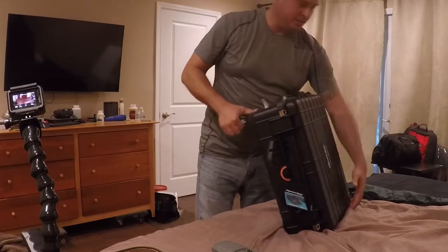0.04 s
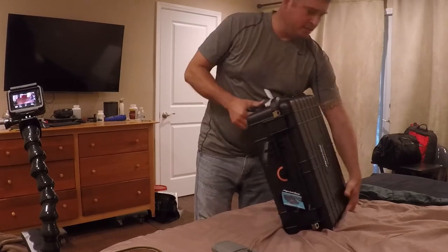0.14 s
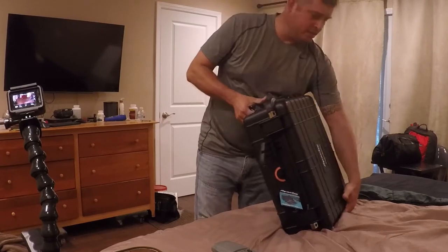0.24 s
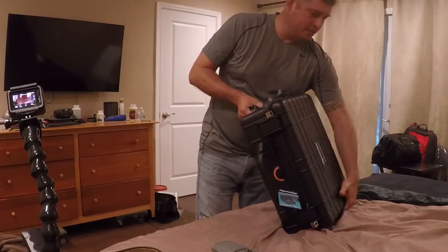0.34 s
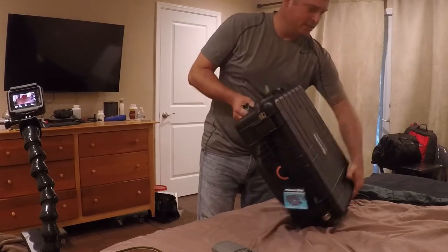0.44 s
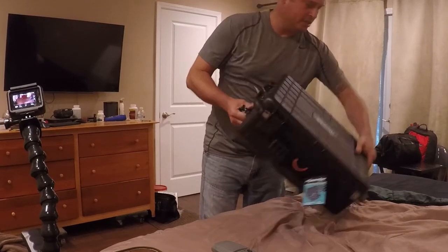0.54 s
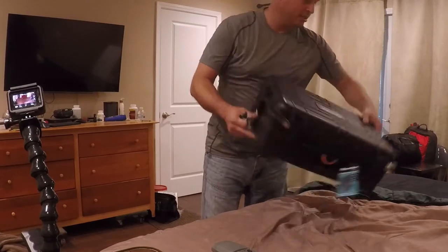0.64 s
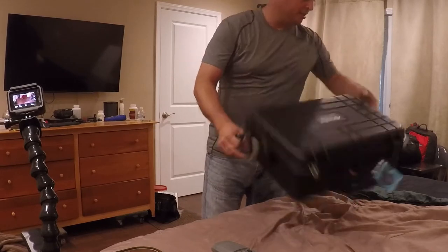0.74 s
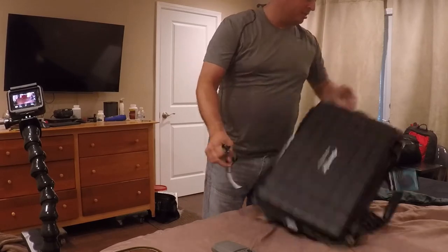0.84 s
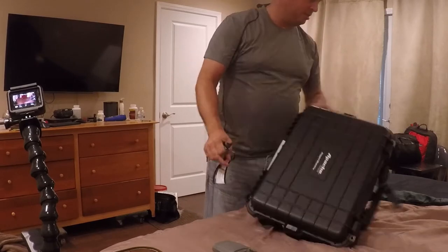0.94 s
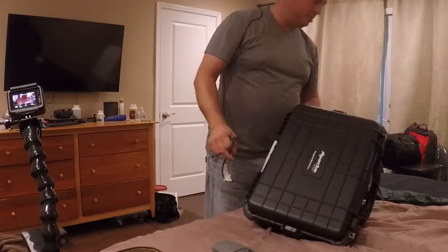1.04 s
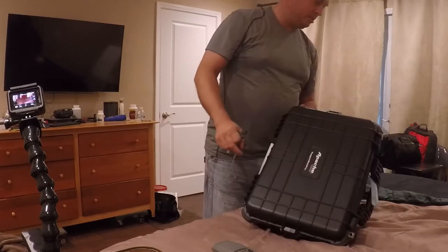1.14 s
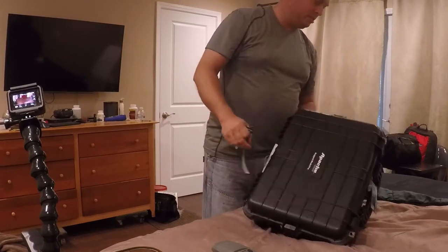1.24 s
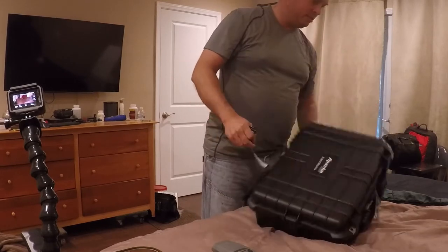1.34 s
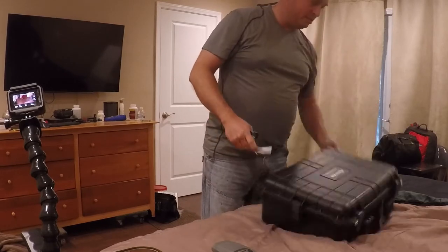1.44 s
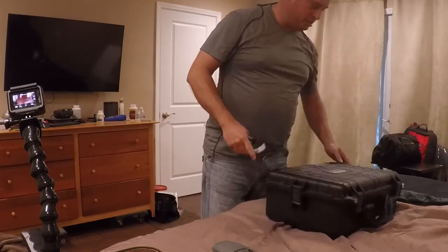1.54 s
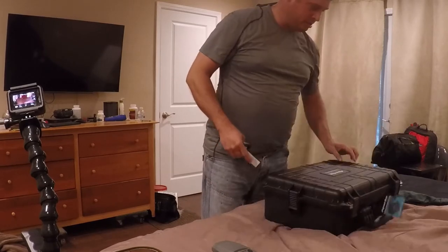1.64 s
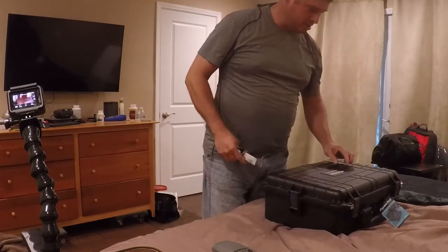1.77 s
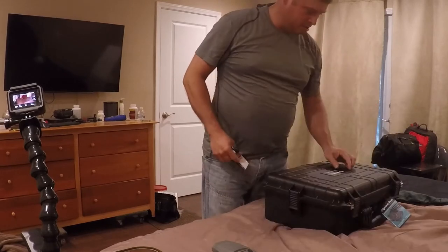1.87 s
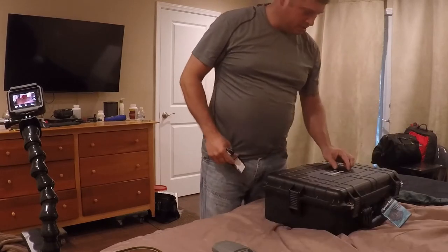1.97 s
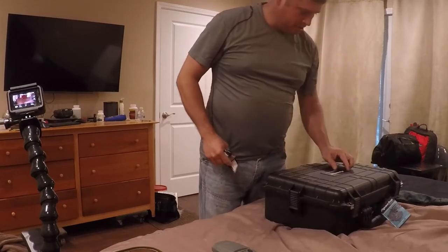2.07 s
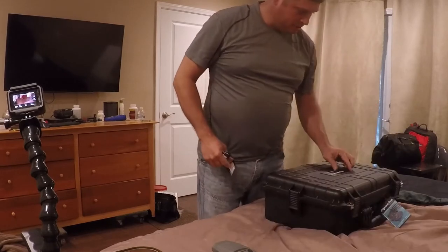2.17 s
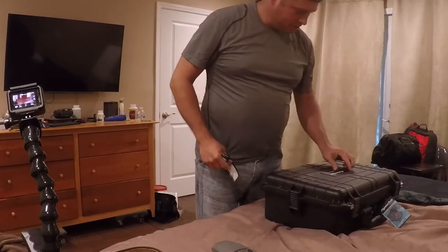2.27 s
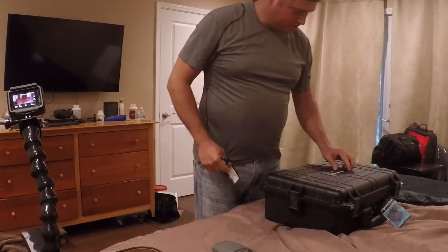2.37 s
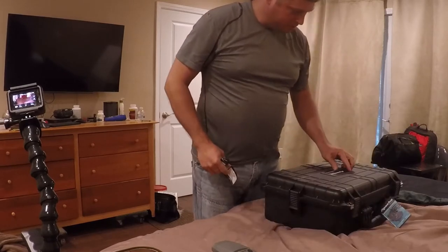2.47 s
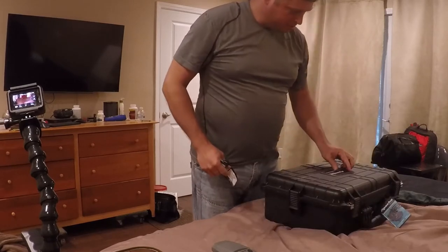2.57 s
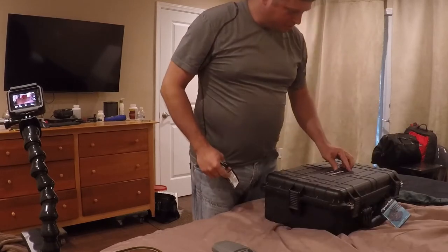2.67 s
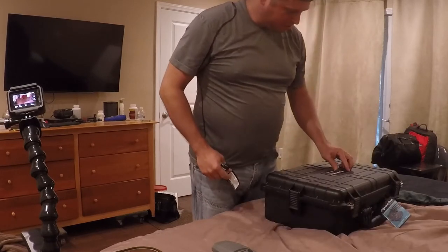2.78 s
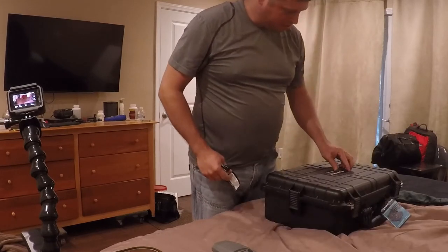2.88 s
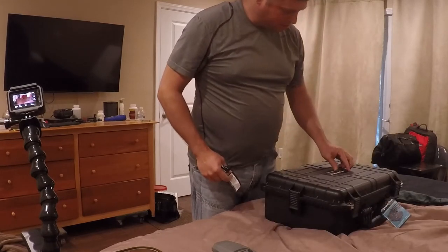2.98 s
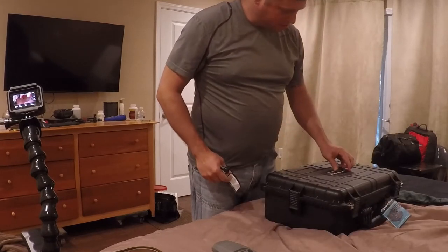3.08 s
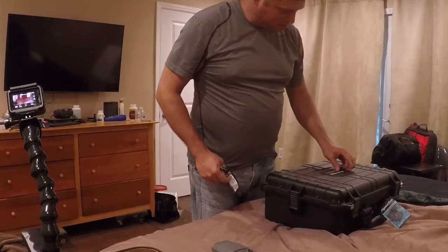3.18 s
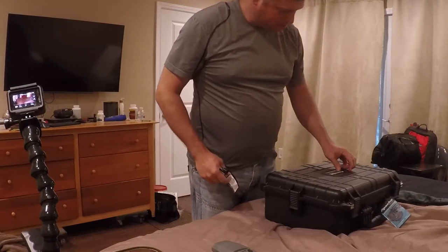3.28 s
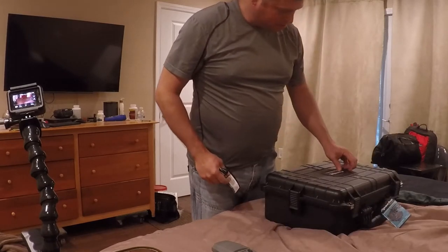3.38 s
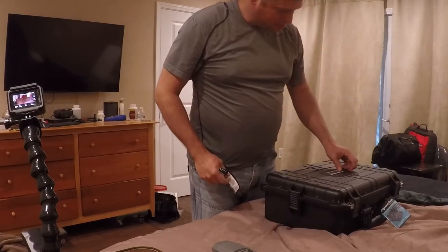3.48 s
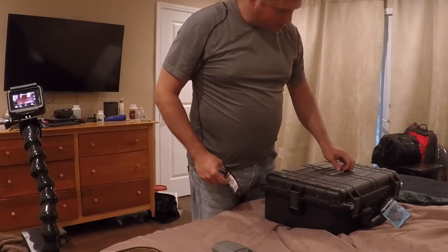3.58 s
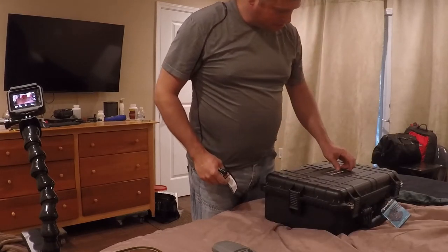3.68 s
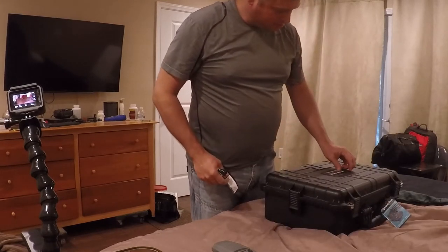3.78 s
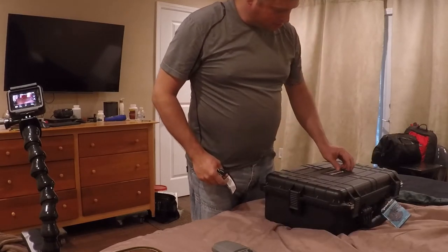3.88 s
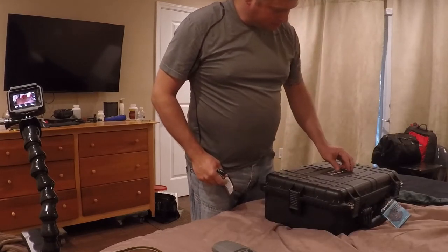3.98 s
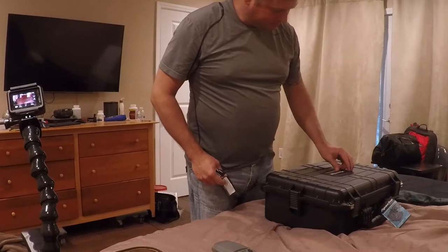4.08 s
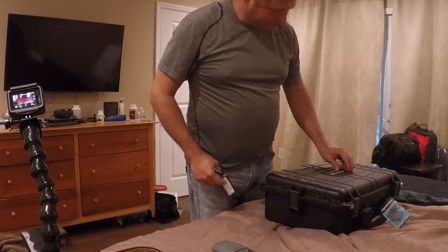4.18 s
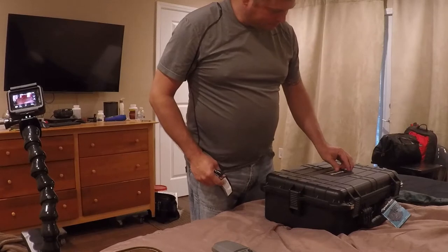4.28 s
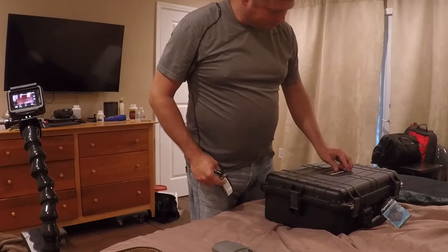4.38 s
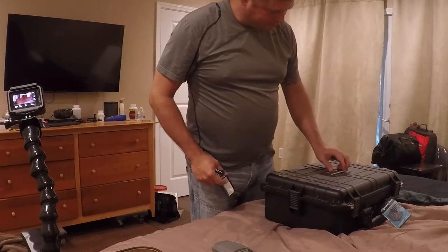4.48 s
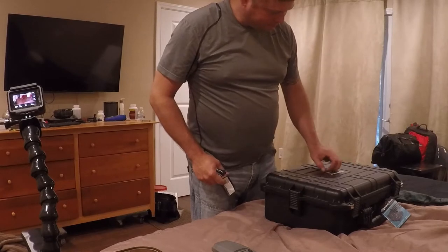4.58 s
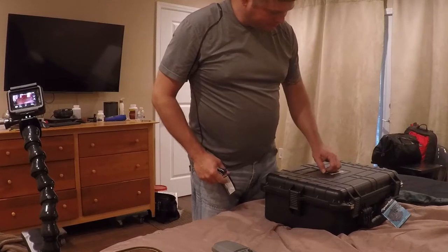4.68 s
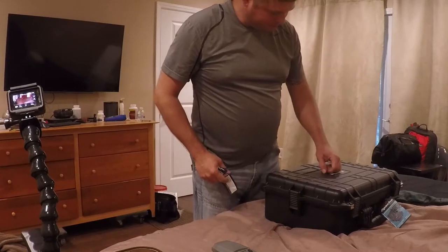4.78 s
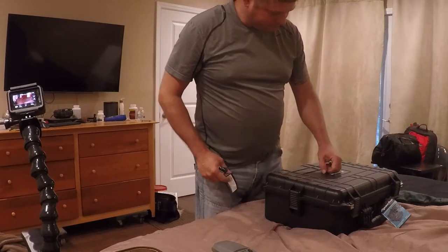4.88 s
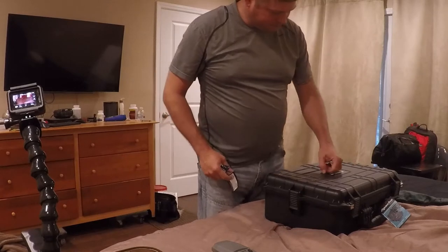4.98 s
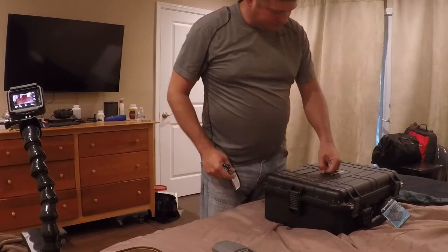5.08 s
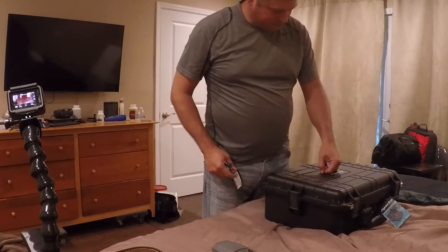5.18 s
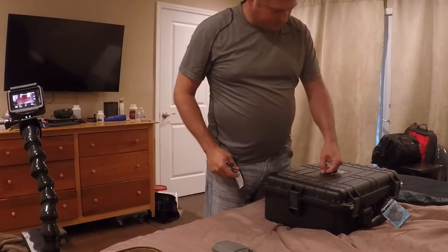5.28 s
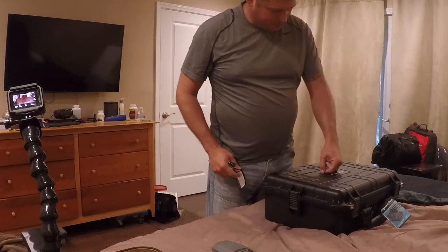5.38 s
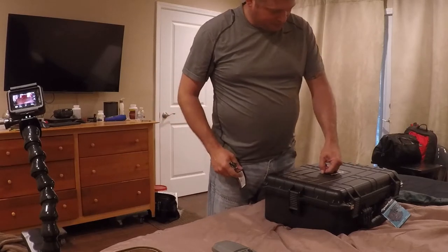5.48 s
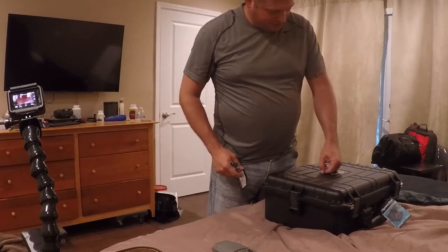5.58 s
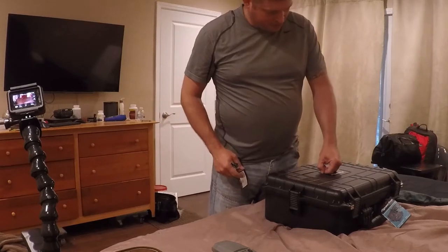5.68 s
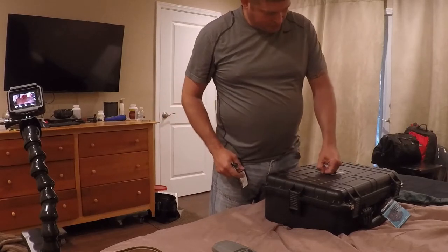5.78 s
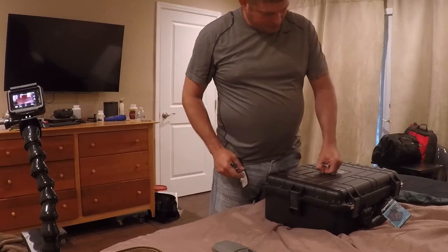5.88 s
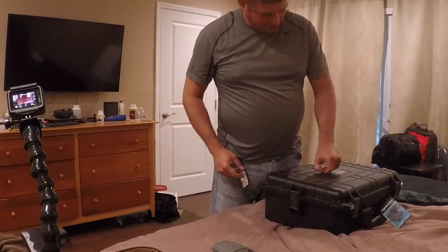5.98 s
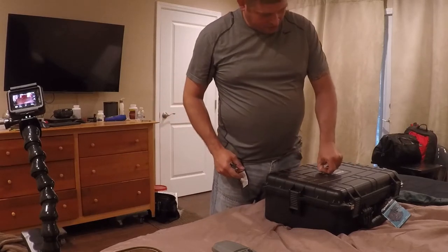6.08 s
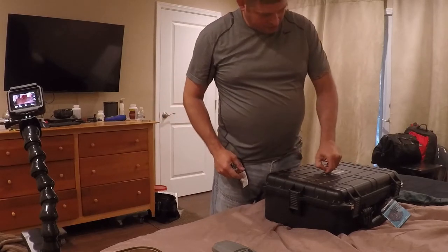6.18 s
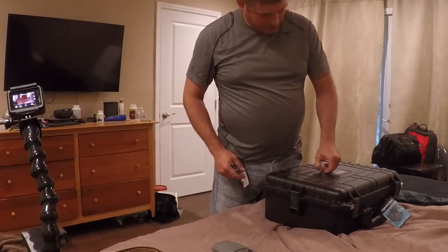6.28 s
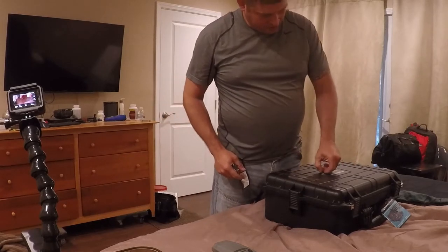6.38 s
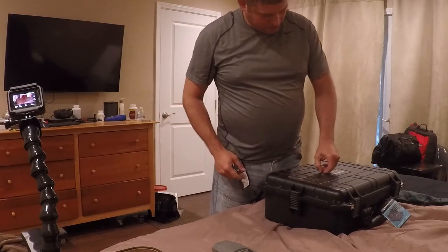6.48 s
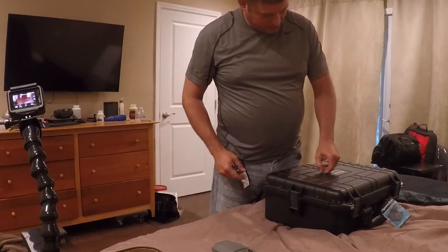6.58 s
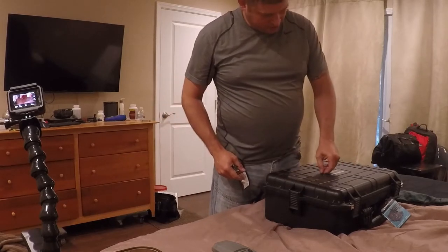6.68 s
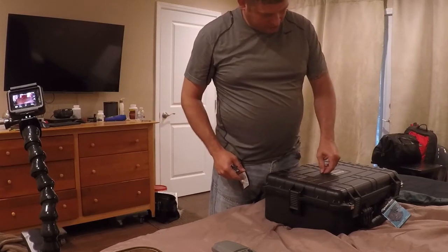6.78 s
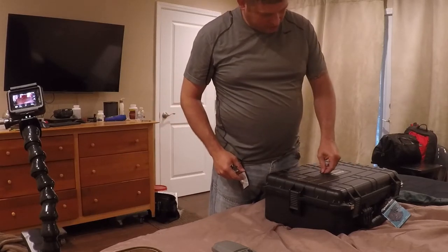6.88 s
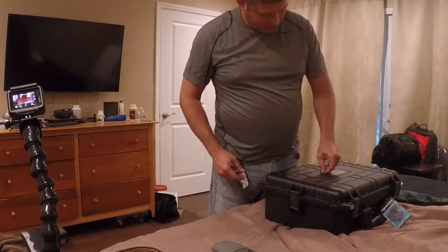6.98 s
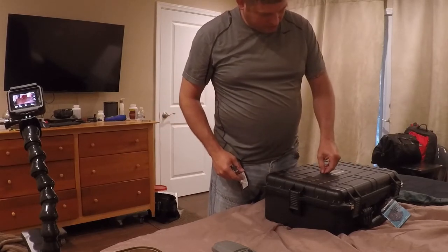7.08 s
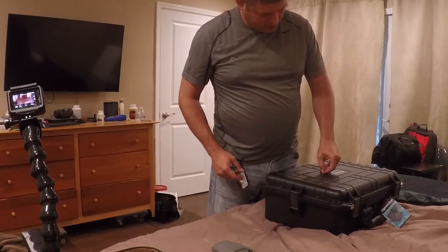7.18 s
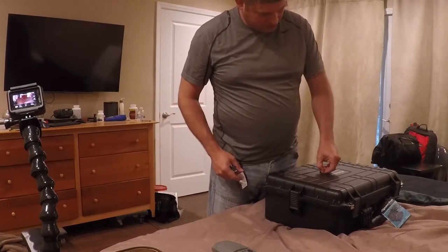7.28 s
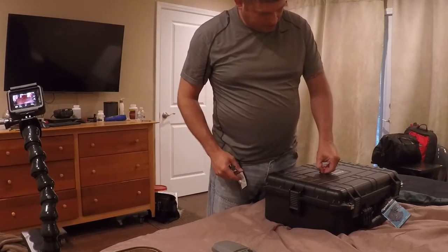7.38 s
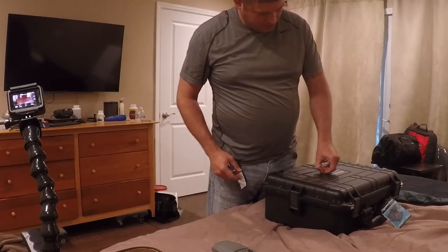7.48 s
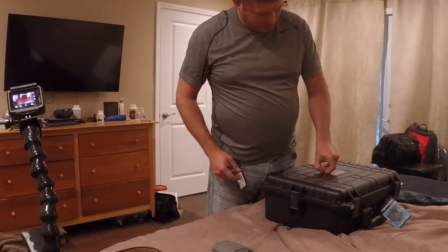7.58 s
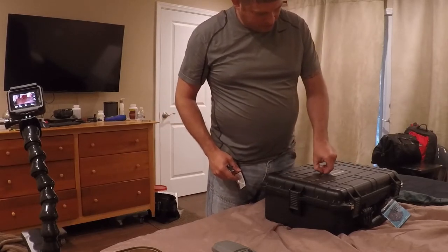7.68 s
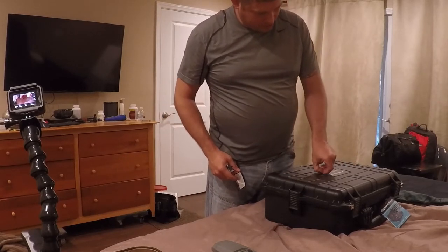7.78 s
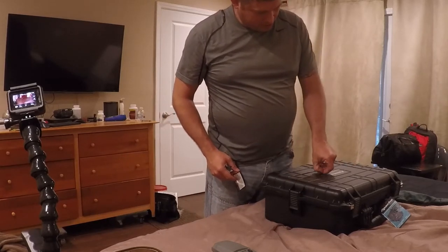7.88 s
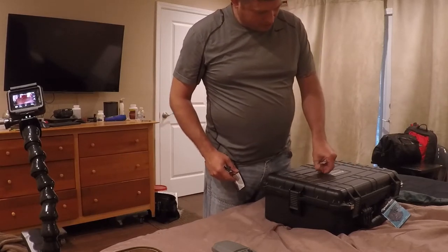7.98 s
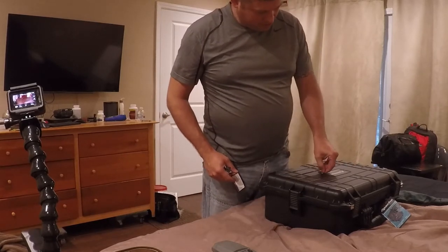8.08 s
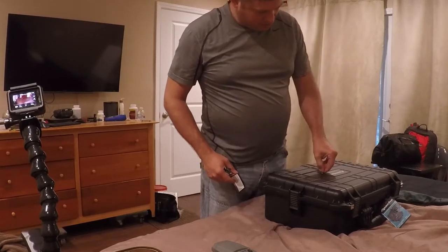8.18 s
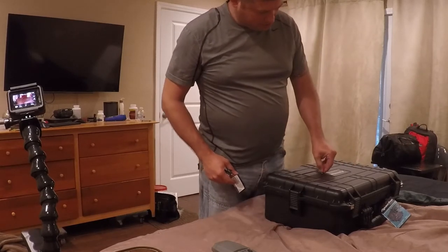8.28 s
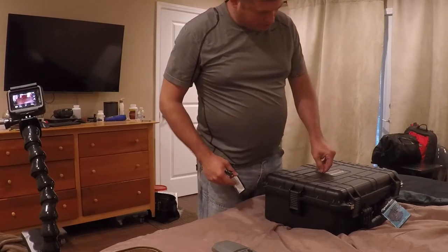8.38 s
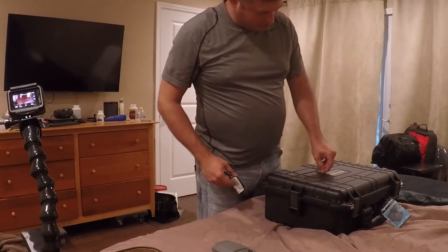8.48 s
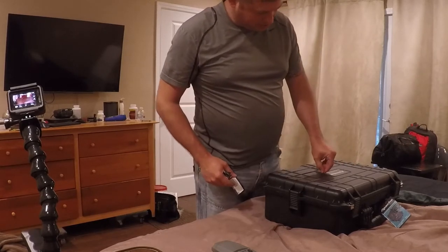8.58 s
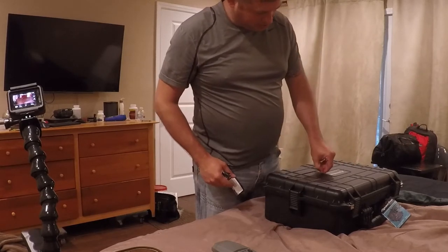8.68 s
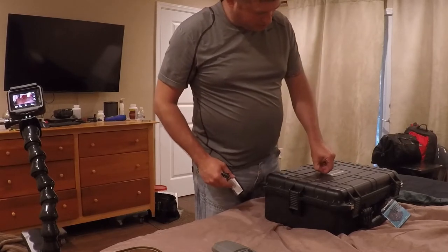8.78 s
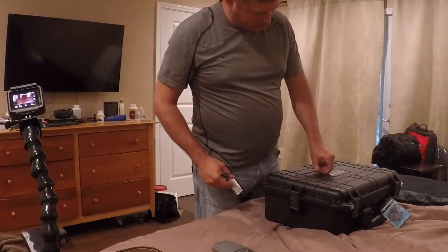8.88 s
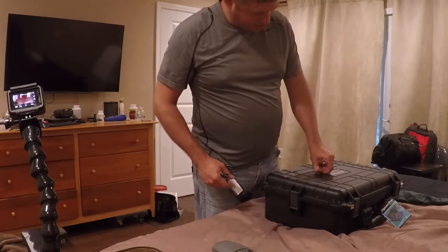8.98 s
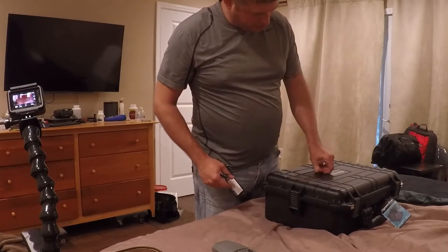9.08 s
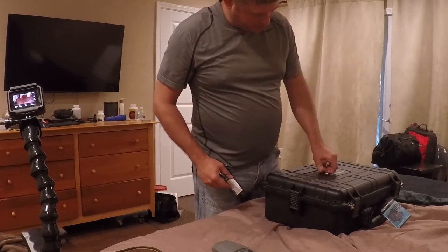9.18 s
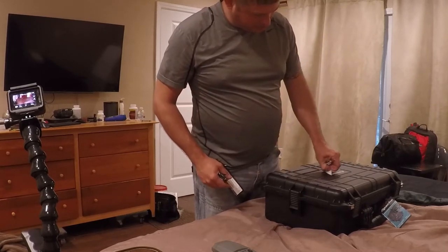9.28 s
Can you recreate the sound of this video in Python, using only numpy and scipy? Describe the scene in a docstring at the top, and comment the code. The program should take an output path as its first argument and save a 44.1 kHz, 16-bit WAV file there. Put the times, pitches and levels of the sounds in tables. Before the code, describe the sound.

In a quiet bedroom, stiff labels rip off a hollow plastic case that thumps onto a bed, then fingernails pick faintly at its lid.

```python
"""Cloth rustles over a quiet room as a hard plastic case is turned over and laid on a bed, and labels are torn off.
Knocks and fingers excite decaying modes of the hollow shell; rubbing stirs it with filtered random impulses.
A nail picks at a label's edge in short resonant noise bursts and scratches the shell's grain.
The glue lets go in bursts of tiny snaps, filtered by the free flap; the camera cuts the deep bass."""
import sys
import numpy as np
from scipy import signal
from scipy.fft import rfft, irfft, next_fast_len
from scipy.io import wavfile
from scipy.ndimage import map_coordinates

SR = 44100
rng = np.random.default_rng(int(sys.argv[2]) if len(sys.argv) > 2 else 0)


def bounce(signal):
    """Save signal as a 16-bit WAV file at the path given by the first command-line argument."""
    frames = np.transpose(np.atleast_2d(signal))
    limited = np.clip(frames, -1, 1)
    pcm = np.round(limited * 32767).astype(np.int16)
    wavfile.write(sys.argv[1], SR, pcm)


N = 411894


def amp(db):
    """Decibels to gain."""
    return 10 ** (np.asarray(db) / 20)


def unit(x):
    """Scale to rms 1."""
    return x / np.sqrt(np.mean(x ** 2) + 1e-20)


def crest(x):
    """Scale to peak 1."""
    return x / (np.abs(x).max() + 1e-12)


def along(points, hz):
    """Read (Hz, value) points on a log-frequency axis."""
    point_hz, value = np.transpose(points)
    return np.interp(np.log(hz + 1), np.log(point_hz + 1), value)


def below(hz, top_hz):
    """Gain of a second-order low-pass."""
    return 1 / np.hypot(1, (hz / top_hz) ** 2)


def wobble(knots_per_s):
    """Smooth random curve through normally distributed knots."""
    knots = rng.standard_normal(int(N * knots_per_s / SR) + 4)
    return map_coordinates(knots, [np.arange(N) * knots_per_s / SR])


def coloured(x, gain):
    """Causal (minimum-phase) filter with the given gain of frequency."""
    n = x.shape[-1]
    m = 2 * next_fast_len(n // 2 + 4096)
    hz = np.fft.rfftfreq(m, 1 / SR)
    cepstrum = irfft(np.log(np.maximum(gain(hz), 1e-6)))
    # folding the cepstrum onto positive time gives minimum phase
    cepstrum[1:m // 2] *= 2
    cepstrum[m // 2 + 1:] = 0
    response = np.exp(rfft(cepstrum))
    return irfft(rfft(x, m) * response, m)[..., :n]


def filtered(x, gain):
    """Zero-phase filter with the given gain of frequency."""
    m = next_fast_len(N + SR // 2)
    return irfft(rfft(x, m) * gain(np.fft.rfftfreq(m, 1 / SR)), m)[..., :N]


def shaped(x, spectrum):
    """Filter x causally by a (Hz, dB) curve."""
    return coloured(x, lambda hz: amp(along(spectrum, hz)))


def spread(pair, width):
    """Two unrelated signals as a diffuse stereo field: mid plus and minus side."""
    side = shaped(pair[1], width)
    return np.array([pair[0] + side, pair[0] - side])


def add(track, start_s, sound):
    """Mix a stereo sound in at start_s."""
    start = max(round(start_s * SR), 0)
    part = sound[:, :max(N - start, 0)]
    track[:, start:start + part.shape[1]] += part


def snaps(n, per_s, scatter_db):
    """Random impulses of uneven size and either sign, rms 1."""
    chance, size = rng.random(n), rng.standard_normal(n)
    height = amp(scatter_db * np.clip(size, -2, 2))
    return unit((chance < per_s / SR) * height * rng.choice([-1, 1], n))


# Room decay. Each row: frequency in Hz, t60 in s.
ROOM_T60 = [(120, 0.5), (320, 0.25), (840, 0.37), (2200, 0.32), (5800, 0.36), (14000, 0.25)]
# Stereo width of the reflected sound. Each row: frequency in Hz, side re mid gain in dB.
ROOM_WIDTH = [(130, 0.5), (280, -30), (500, -6), (900, 1), (1400, -1.5), (2200, -0.5), (4000, -6.5),
              (7500, 3.5), (12000, 2)]


def in_room(x, wet_db, build_s=0.0016):
    """Direct sound plus a random wall tail that builds up, then decays at its own speed per frequency."""
    hz, t, z = signal.stft(rng.standard_normal((2, SR // 2)), SR, nperseg=256)
    decay = amp(-60 * t / along(ROOM_T60, hz)[:, None])
    tail = signal.istft(z * decay, SR, nperseg=256)[1]
    tail_t = np.arange(tail.shape[1]) / SR
    tail = tail * (1 - np.exp(-(tail_t / build_s) ** 2))
    answer = amp(wet_db) * spread(tail / np.linalg.norm(tail[0]), ROOM_WIDTH)
    answer[:, 0] += 1  # direct sound
    return signal.fftconvolve(x[None], answer, axes=1)


# Air noise and microphone hiss. Each row: frequency in Hz, gain in dB.
QUIET_SPECTRUM = [(40, -6), (110, -2.5), (190, 1.5), (300, -3.5), (500, -10), (1000, -15), (2000, -18.5),
                  (3300, -22.5), (4800, -25.5), (7000, -22.5), (9500, -25.5), (12000, -31), (15000, -40.5)]
# Stereo width of that noise. Each row: frequency in Hz, side re mid gain in dB.
QUIET_WIDTH = [(130, 1), (250, 0.5), (400, 5), (750, 10.5), (1300, 8), (2400, 0), (4400, -3.5), (8000, 0.5)]


def room_tone(level_db=-49):
    """Steady air noise and microphone hiss: filtered white noise, spread in stereo."""
    noise = shaped(rng.standard_normal((2, N)), QUIET_SPECTRUM)
    return amp(level_db) * unit(spread(noise, QUIET_WIDTH))


# Shirt and bedding brushing the case. Each row: start in seconds, time to release in seconds, motion level in dB.
SWISHES = [(0, 0.97, -55), (1.286, 0.19, -55), (1.553, 0.18, -61.5), (1.686, 0.054, -55)]
# Cloth fibres. Each row: frequency in Hz, gain in dB.
RUSTLE_SPECTRUM = [(200, -5), (800, -3), (1400, 0.5), (2600, -2.5), (4900, -7.5), (7200, -4), (9000, -14.5),
                   (11500, -26), (15000, -59)]
# Hollow shell when rubbed. Each row: frequency in Hz, gain in dB.
HOLLOW_SPECTRUM = [(40, -19), (90, -2), (150, -9.5), (200, 3.5), (265, 4), (380, -7.5), (520, -17.5),
                   (1000, -28.5), (3000, -51.5)]
SWISH_ATTACK_S, SWISH_RELEASE_S = 0.046, 0.13


def handling(bump_db=-2):
    """Cloth brushes the moving case in fine grains and stirs its hollow; each swish rises, holds and settles."""
    t = np.arange(N) / SR
    motion = np.zeros(N)
    for start_s, length_s, db in SWISHES:
        rise = np.clip((t - start_s) / SWISH_ATTACK_S, 0, 1)
        settle = np.exp(-np.maximum(t - start_s - length_s, 0) / SWISH_RELEASE_S)
        motion += amp(db) * rise * settle
    fibres = unit(shaped(snaps(N, per_s=1100, scatter_db=0.5), RUSTLE_SPECTRUM))
    bumps = unit(shaped(snaps(N, per_s=460, scatter_db=3.0), HOLLOW_SPECTRUM))
    unevenness = amp(3.3 * wobble(knots_per_s=24.54))
    cloth = motion * unevenness * (fibres + amp(bump_db) * bumps)
    return in_room(cloth, wet_db=-2.5)[:, :N]


def murmur(length_s):
    """Small sticks and slips, as random impulses, stir the hollow shell; rms 1 before the room."""
    n = int(length_s * SR)
    slips = signal.windows.tukey(n, .6) * snaps(n, per_s=430, scatter_db=6.5)
    return in_room(unit(shaped(slips, HOLLOW_SPECTRUM)), wet_db=-6.0)


# Label radiation. Each row: frequency in Hz, gain in dB.
LABEL_SPECTRUM = [(300, -31), (800, 7), (1450, 6.5), (2400, 1), (3500, 2), (5100, -6.5), (6300, 4.5),
                  (7400, 0), (8600, -9), (10500, -11.5), (11600, -23), (14500, -22.5)]
FIZZ_HZ = 9800  # fizz gain in dB is at half here


def flap(x, flap_hz, fizz_db):
    """The free part of a label radiates weakly below its lowest pitch; fizz_db sets its top treble."""
    fizz = lambda hz: fizz_db * np.clip(2 * (hz / FIZZ_HZ) ** 2 - 1.5, 0, 1)
    radiation = lambda hz: (hz / np.hypot(hz, flap_hz)) ** 3
    return coloured(x, lambda hz: amp(along(LABEL_SPECTRUM, hz) + fizz(hz)) * radiation(hz))


# Pulls on a label. Each row: start in seconds, length in seconds, level before the room in dB,
# swell over the pull in dB, lowest flap pitch at the start in Hz, at the end in Hz,
# opening snap in dB, fizz in dB, strands breaking per second.
PULLS = [(0, 0.052, -44.5, -21, 1280, 1200, 8, -2, 860), (0.098, 0.051, -44, -10.5, 1120, 950, -3, -2, 780),
         (0.635, 0.11, -32.5, -3.5, 2460, 1290, -2, 3, 650),
         (1.402, 0.014, -35.5, 2, 1200, 1200, 7, -6, 2500),
         (9.108, 0.041, -46, 11, 8500, 8000, -8, 2, 1500), (9.139, 0.027, -38, 3, 8000, 7500, -5, -9, 3200),
         (9.24, .022, -41.5, 2, 2200, 1700, -6, 0, 900),
         (9.263, 0.068, -36.5, -0.5, 1390, 1300, -9, 2.5, 2100)]
LET_GO_S, STRAND_DECAY_S = 0.002, .00018  # opening snap, one strand's crackle
TUG_DB = -9  # shell murmur re tearing


def peeling():
    """Strands of glue snap one after another, shake the flap and tug the shell; the flap's pitch glides."""
    out = np.zeros((2, N))
    for start_s, length_s, db, swell_db, start_hz, end_hz, snap_db, fizz_db, strands_per_s in PULLS:
        n = int(length_s * SR)
        done = np.linspace(0, 1, n)
        strands = np.abs(snaps(n, per_s=strands_per_s, scatter_db=2.6))
        strain = unit(signal.lfilter([1], [1, -np.exp(-1 / (STRAND_DECAY_S * SR))], strands))
        glue = (strain + .24) * rng.standard_normal(n)
        opening_db = snap_db * np.exp(-done * length_s / LET_GO_S)
        pull = glue * amp(swell_db * done + opening_db)
        # crossfade from the starting to the ending flap, with 10 ms to ring out
        early, late = np.pad(pull * [1 - done, done], ((0, 0), (0, SR // 100)))
        tear = flap(early, start_hz, fizz_db) + flap(late, end_hz, fizz_db)
        add(out, start_s, amp(db) * in_room(unit(tear), wet_db=0))
        add(out, start_s, amp(db + TUG_DB) * murmur(length_s))
    return out


# Modes of the hollow shell. Each row: frequency in Hz, level in dB re its family, t60 in s at ring share 1.
SHELL_MODES = [(134.3, -13.5, 0.33), (157.8, -1, .18), (190.1, 10.5, 0.15), (240.3, 6.5, 0.13),
               (252.4, 3.5, .13), (272.5, -0.5, 0.18), (309.4, 0.5, 0.099), (357.6, 2.5, 0.12),
               (393, -4.5, 0.28), (413.2, 7.5, 0.063), (441, -5, 0.11), (484, -4.5, 0.1), (547, -9, 0.16),
               (600, -1, 0.097), (654, -5, 0.085), (710, -5.5, 0.073), (870, 4, 0.017), (996, -2, .07),
               (1210, 9, 0.018), (1247, -2, 0.096), (1570, 0, .03), (1810, 1, 0.039)]
# Hard contact on plastic. Each row: frequency in Hz, gain in dB.
CRACK_SPECTRUM = [(250, -2.5), (500, 3), (780, 6), (1000, 0.5), (1300, 0.5), (1700, -3.5), (2100, -9.5),
                  (4000, -8.5), (5200, -16.5), (7000, -8.5), (10000, -28.5)]
THUD_DB, THUD_DB_PER_DB = -16.5, 0.5452  # thud re boom for a -21.5 dB blow; slope with blow level
PANEL_DB, PANEL_DB_PER_DB = -1, 0.75  # panels re boom at hardness 0 dB; slope with hardness


def blow(db, hardness_db, lid_db, top_hz, ring_share, clack_db=3, rim_db=-9, crack_t60_s=0.034):
    """One contact rings the shell's modes: heavy blows thud more, hard ones ring the panels and clack more."""
    t = np.arange(SR // 3) / SR
    hz, level_db, t60_s = np.transpose(SHELL_MODES)[:, :, None]
    family = np.digitize(hz[:, 0], [172, 290, 410, 750])
    modes = amp(level_db - 60 * t / (t60_s * ring_share)) * np.sin(2 * np.pi * hz * t)
    # each blow lands on another spot: new mode strengths, high modes with either sign
    sign = np.where(hz > 410, rng.choice([-1, 1], hz.shape), 1)
    ring = sign * modes * amp(1.5 * rng.standard_normal(hz.shape))
    thud, boom, panels, lid, rim = [crest(ring[family == k].sum(0)) for k in range(5)]
    # softer contacts push more slowly
    contact_s = np.clip(.0005 * amp(-hardness_db), .0005, .005)
    push = 1 - np.exp(-(t / contact_s) ** 2)
    body = boom + amp(THUD_DB + THUD_DB_PER_DB * (db + 21.5)) * thud
    # noise stands for the ribbed shell's dense high modes
    crack = shaped(rng.standard_normal(len(t)) * amp(-60 * t / crack_t60_s), CRACK_SPECTRUM)
    edge = coloured(crest(crest(crack) + amp(rim_db) * rim), lambda f: below(f, top_hz))
    clatter = amp(PANEL_DB + PANEL_DB_PER_DB * hardness_db) * panels
    clatter = clatter + amp(lid_db) * lid + amp(hardness_db + clack_db) * edge
    return amp(db) * (in_room(push * body, wet_db=-8.5) + in_room(push * clatter, wet_db=-1.5))


# Blows on the shell. Each row: start in seconds, boom level in dB, hardness in dB (sets the clack),
# lid ring re boom in dB, low-pass corner of the clack in Hz, ring share 0-1 (less where a hand damps it).
KNOCKS = [(.186, -26, -12, -17, 5000, 0.3), (.646, -12, -14.5, -14, 4000, .75),
          (.826, -28.5, -7.5, -6.5, 4000, 1), (.896, -12, -28.5, -23, 2000, 0.93),
          (0.9767, -4.5, -5, -18, 7000, 0.73), (.987, -5, -14, -9, 5000, .85),
          (1.011, -11, -8.5, -6, 4000, 0.6), (1.047, -19.5, -6, 0, 2500, 0.4),
          (1.073, -23, -15, -9, 2500, .5), (1.383, -25.5, -8, -14, 4000, 1),
          (1.466, -29, -15, -6, 2000, .8), (1.481, -23, -12.5, -7, 2480, 0.86),
          (1.755, -9, -14.5, -12, 7000, 0.82), (1.768, -17, -15, -14, 2500, 0.8),
          (1.812, -25.5, -12, -12, 5000, .7), (2.823, -24.5, -18, -26, 1500, 0.88),
          (3.492, -12.5, -22, -25, 2500, 0.7), (3.663, -21.5, -23, -23, 1500, 0.82),
          (3.902, -27.5, -32, -25, 1500, 0.86), (4.511, -31.5, -14, -18, 2000, 1),
          (4.61, -11.5, -25.5, -30.5, 2500, 0.84), (4.663, -24, -18, -26, 1500, .83),
          (4.846, -16.5, -19.5, -27, 1200, 0.27), (5.091, -25, -20.5, -24, 1500, 0.4),
          (5.6171, -26, -3, -15, 3930, 0.43), (5.625, -24, -11.5, -10, 3500, 0.3),
          (5.991, -32.5, -11, -21, 2500, 0.4), (6.254, -22, -18, -18, 1500, 0.45),
          (6.896, -37.5, -11, -17, 2000, 1), (8.178, -24, -32, -28, 1500, 0.5),
          (9.11, -31, -13, -20.5, 2500, 0.9), (9.245, -26.5, -18, -19, 2000, 0.9),
          (9.263, -28, -14, -14, 2000, .8), (9.297, -25.5, -14, -16, 2000, 0.9)]


def knocks():
    """Hands, body and bed strike the shell and ring its modes."""
    out = np.zeros((2, N))
    for start_s, *contact in KNOCKS:
        add(out, start_s, blow(*contact))
    return out


# Nail scrapes over the shell's grain. Each row: start in seconds, length in seconds, level before the room in dB.
SCRAPES = [(0.312, 0.065, -55.5), (0.402, 0.021, -57.5), (0.569, 0.05, -52), (1.347, 0.08, -53),
           (2.7, 0.045, -61), (3.495, 0.2, -69), (3.799, 0.025, -56.5), (3.942, 0.032, -61.5),
           (4.411, 0.13, -62), (5.265, 0.29, -67.5)]
# Nail on textured plastic. Each row: frequency in Hz, gain in dB.
SCRATCH_SPECTRUM = [(500, -38), (950, -11), (1350, 4), (2400, -6), (3600, -6), (5000, -12), (7000, -6),
                    (9000, -24), (14000, -29)]


def scrapes():
    """The nail catches on the shell's grain: filtered random impulses that fade in and out."""
    out = np.zeros((2, N))
    for start_s, length_s, db in SCRAPES:
        n = int(length_s * SR)
        catches = signal.windows.tukey(n, .6) * snaps(n, per_s=700, scatter_db=4.5)
        grit = unit(shaped(catches, SCRATCH_SPECTRUM))
        add(out, start_s, in_room(amp(db) * grit, wet_db=2.0))
    return out


# Nail picks, glue snaps and crackles of stiff paper. Each row: start in seconds,
# peak in dB before trim and room, corner resonance in Hz, its height in dB, low-pass corner in Hz, burst t60 in s.
PICKS = [(0.426, -34.5, 5900, 10, 9000, 0.019), (.6341, -13, 7340, -2, 15000, 0.0064),
         (0.6467, -14, 7000, 8, 12100, .005), (0.6533, -18, 6500, -1, 12000, 0.0044),
         (.66, -17, 4200, 9, 9000, 0.0055), (0.6774, -12, 4170, 9, 9000, 0.0064),
         (0.6948, -11.5, 5200, 2, 15000, .004), (0.698, -14.5, 4200, 8, 12000, 0.0054),
         (0.711, -16, 4540, 0, 12000, 0.006), (0.717, -9.5, 7500, 4, 12000, .008),
         (0.7414, -21, 6800, 1, 12000, 0.0055), (0.9223, -25.5, 7000, 7, 9000, .009),
         (1.327, -37, 3330, 15, 4970, .01), (1.3968, -24, 3970, 15, 7000, 0.0072),
         (1.4028, -23, 4780, 12, 9000, 0.0061), (1.407, -14, 5540, 4, 12000, 0.0035),
         (1.409, -21, 4500, 14, 14000, .005), (1.4185, -21, 6000, 12, 9000, 0.0037),
         (1.673, -39, 3040, 9, 6000, .016), (2.715, -42, 6360, 5, 9000, 0.017),
         (3.398, -36.5, 2960, 8, 2500, .012), (3.497, -41.5, 6500, 4, 9000, .016),
         (3.8026, -40.5, 2200, -2, 7000, 0.014), (4.1872, -37.5, 3960, 11, 7000, 0.012),
         (4.196, -46, 6260, 7, 9000, .012), (4.354, -45, 3480, 5, 6000, .016),
         (4.5703, -35.5, 3130, 8, 6500, 0.016), (4.578, -39, 5500, 9, 8000, .012),
         (5.033, -44, 3220, 1, 6000, .016), (5.1722, -40, 6900, 0, 9000, 0.018),
         (5.762, -52, 3100, 12, 3500, 0.011), (5.9885, -44, 7350, 8, 9000, .016),
         (6.856, -40, 4500, -15, 9000, 0.015), (8.136, -47, 3166, 3, 4000, .016),
         (8.336, -44, 3300, 2, 4500, .012), (9.137, -26, 7500, 6, 14000, .005),
         (9.2399, -30, 3020, 9, 9000, 0.0063), (9.3025, -29, 3800, 4, 9000, 0.0046)]
# Nail on a label. Each row: frequency in Hz, gain in dB.
NAIL_SPECTRUM = [(600, -41), (1000, -7), (1600, -5.5), (3300, 0.5), (5200, -2.5), (7200, 5), (9000, -10),
                 (11500, -28), (15000, -30)]
CORNER_OCTAVES = 0.26  # half-width where the resonance's dB height halves
TREBLE_DB, TREBLE_DB_PER_OCTAVE = -13.5, 29  # shelf for a 4 kHz corner; stiffer corners are brighter


def picks(trim_db=-1):
    """A nail slip or glue snap is a short noise burst, coloured by the lifted corner's resonance."""
    out, t = np.zeros((2, N)), np.arange(SR // 20) / SR
    for start_s, db, ring_hz, ring_db, top_hz, t60_s in PICKS:
        attack = 1 - np.exp(-t / .0002)
        burst = rng.standard_normal(len(t)) * amp(-60 * t / t60_s) * attack
        treble_db = TREBLE_DB + TREBLE_DB_PER_OCTAVE * np.log2(ring_hz / 4000)

        def gain(hz):
            """Nail colour, corner resonance, treble shelf and low-pass."""
            corner_db = ring_db / (1 + (np.log2((hz + 1) / ring_hz) / CORNER_OCTAVES) ** 2)
            shelf_db = treble_db * hz ** 2 / (hz ** 2 + 3500 ** 2)
            return amp(along(NAIL_SPECTRUM, hz) + corner_db + shelf_db) * below(hz, top_hz)

        click = crest(coloured(burst, gain))
        add(out, start_s, amp(db + trim_db) * in_room(click, wet_db=-3.5))
    return out


# Fingers dragged over the shell. Each row: start in seconds, length in seconds, level before the room in dB.
RUBS = [(.83, 0.18, -38.5), (2.5, 0.1, -51), (2.839, 0.25, -55.5), (3.55, 0.19, -52), (3.881, 0.49, -54.5),
        (4.44, 0.047, -50.5), (4.723, 0.21, -48.5), (9.24, 0.051, -46)]


def rubs():
    """Skin sticks and slips on the shell and makes it murmur."""
    out = np.zeros((2, N))
    for start_s, length_s, db in RUBS:
        add(out, start_s, amp(db) * murmur(length_s))
    return out


# Soft fingertip touches on the lid. Each row: start in seconds, boom level in dB.
TAPS = [(2.032, -34), (2.128, -38.5), (2.296, -40), (2.525, -46), (2.65, -37), (3.01, -36), (3.853, -37),
        (4.039, -34), (4.191, -36), (4.413, -32), (4.753, -29), (5.893, -35.5), (6.055, -32.5), (6.33, -38),
        (6.366, -29.5), (6.45, -37), (6.509, -44), (6.609, -41), (6.684, -42), (6.737, -46), (7.196, -42),
        (7.384, -44), (7.94, -36), (8.029, -37), (8.452, -40)]


def taps():
    """Fingertips touch the lid softly and damp it: dull blows with a shortened ring."""
    out = np.zeros((2, N))
    for start_s, db in TAPS:
        add(out, start_s, blow(db, hardness_db=-16, lid_db=-17.5, top_hz=1200, ring_share=.55))
    return out


# Stereo balance of the case. Each row: frequency in Hz, left minus right in dB.
CASE_LEAN = [(200, -1), (650, -3.5), (1300, -2.5), (2300, -0.2), (4400, -1.14), (8000, -3.5), (13000, 0)]


def scene():
    """Everything that sounds around the case, which lies a little to the right, over the room tone."""
    case = handling() + peeling() + knocks() + scrapes() + picks() + rubs() + taps()
    placed = filtered(case, lambda hz: amp(np.outer([.5, -.5], along(CASE_LEAN, hz))))
    return placed + room_tone()


# The camera's wind filter. Each row: frequency in Hz, gain in dB.
BASS_CUT = [(30, -18), (70, -28), (105, -22.5), (120, -40), (133, -2), (148, 1.5)]
TOP_HZ = 15200


def record(dry):
    """The camera's steep bass cut and its band limit."""
    return filtered(shaped(dry, BASS_CUT), lambda hz: hz < TOP_HZ)


dry = scene()
out = record(dry)
bounce(out)
```